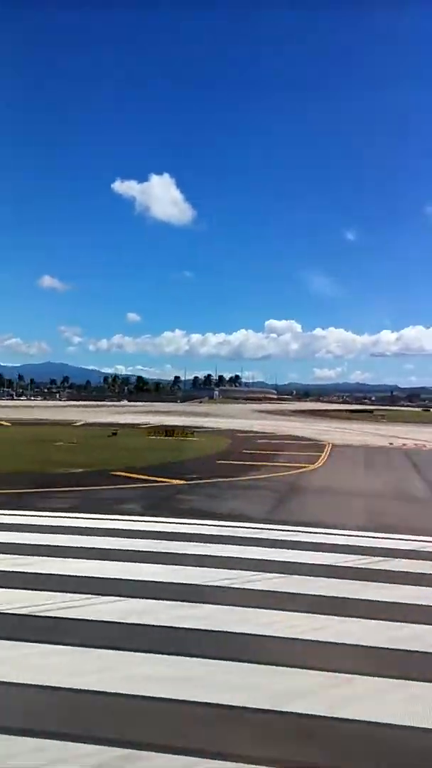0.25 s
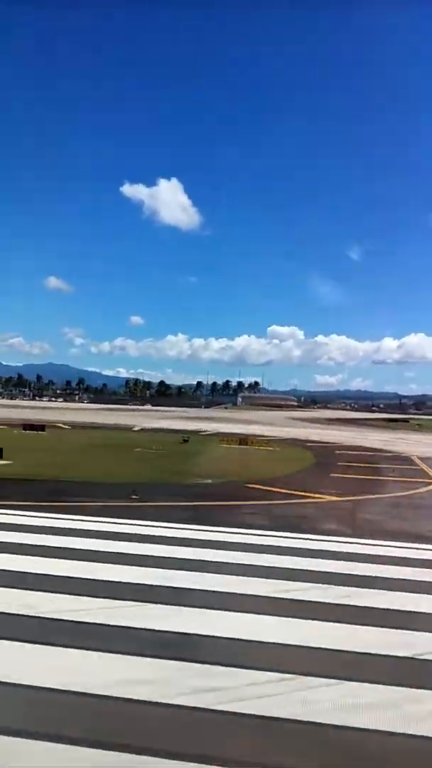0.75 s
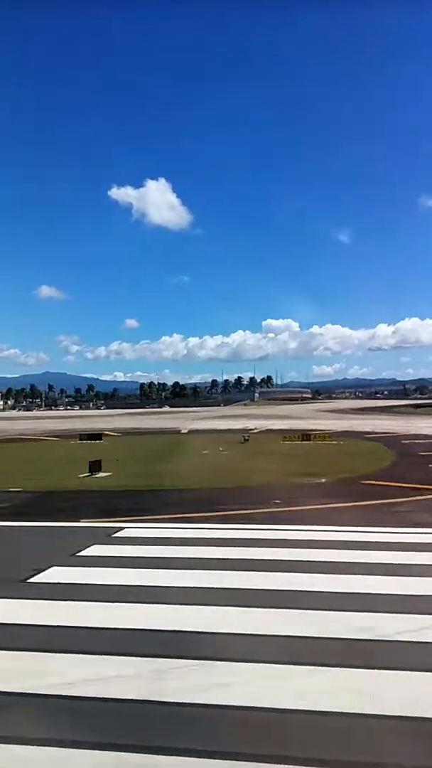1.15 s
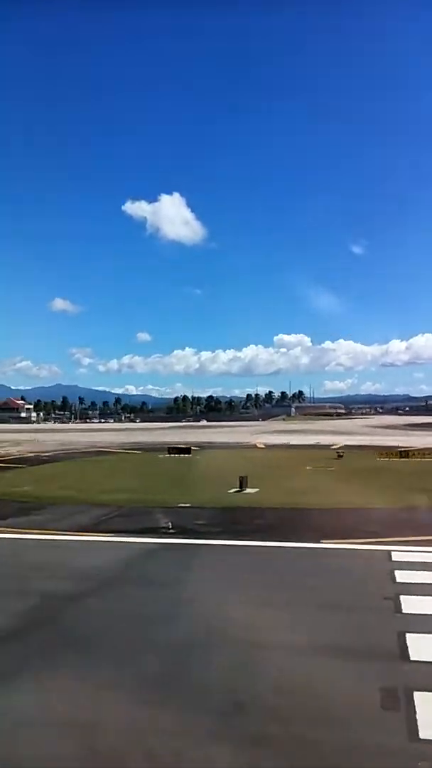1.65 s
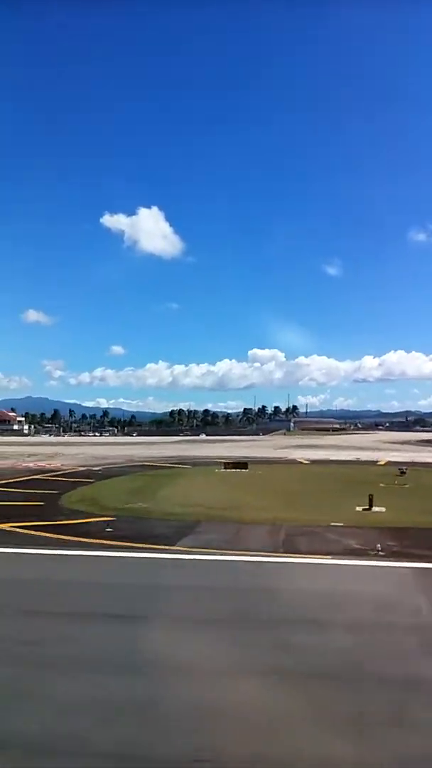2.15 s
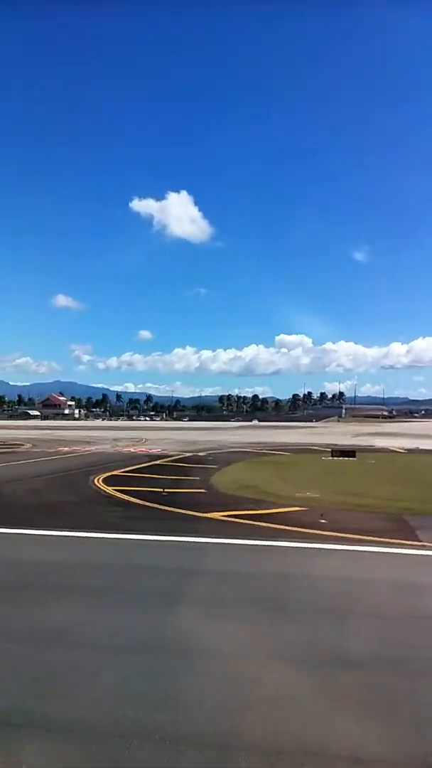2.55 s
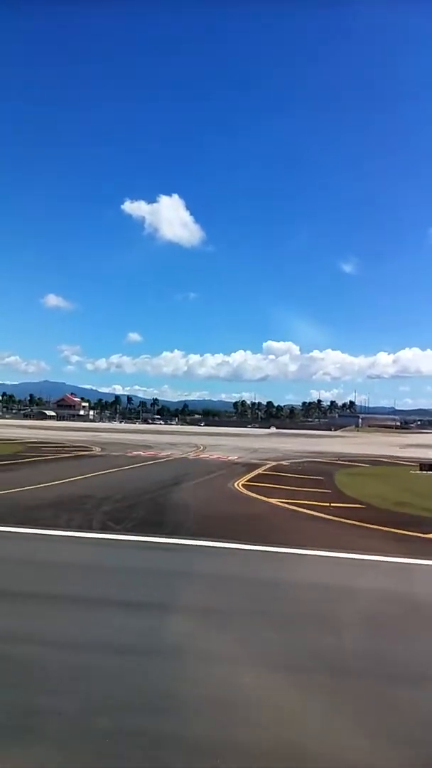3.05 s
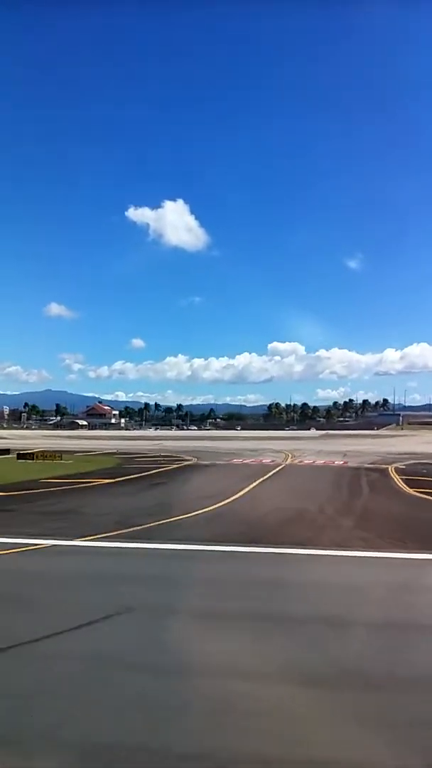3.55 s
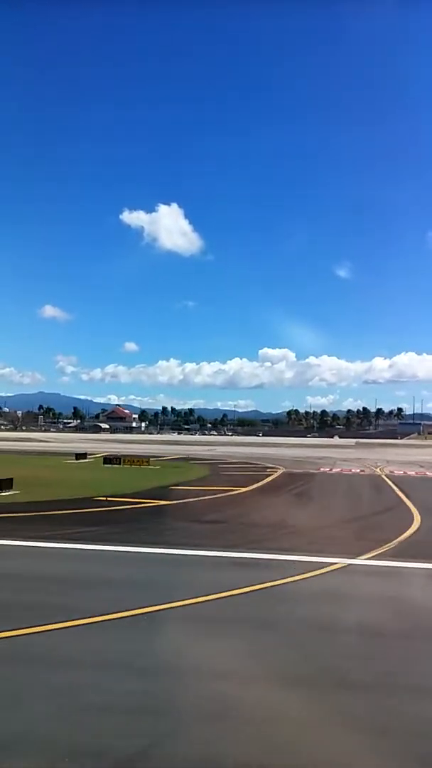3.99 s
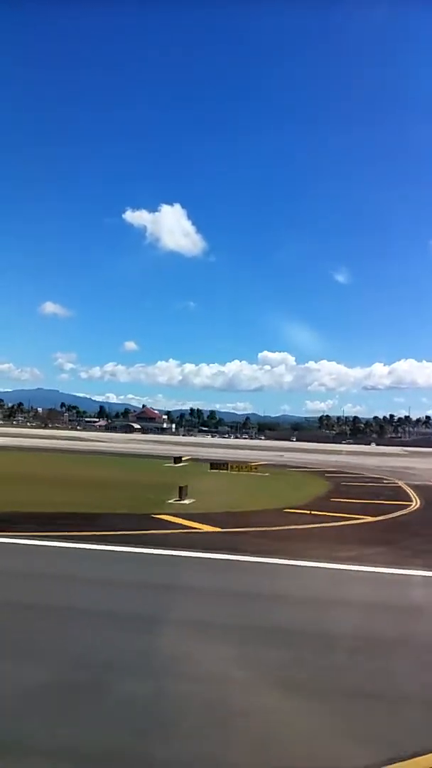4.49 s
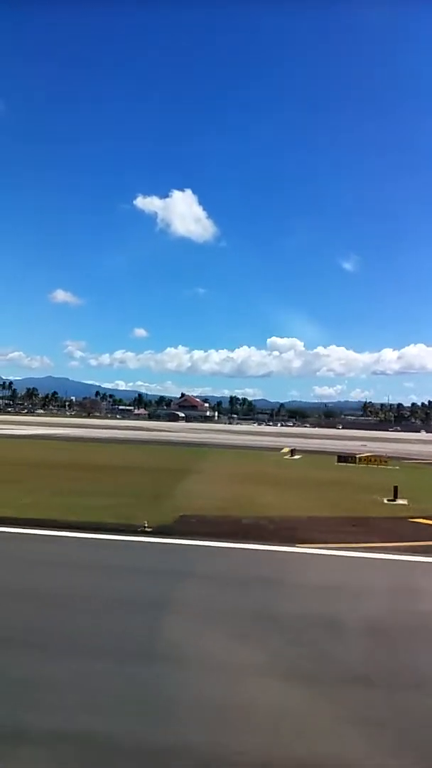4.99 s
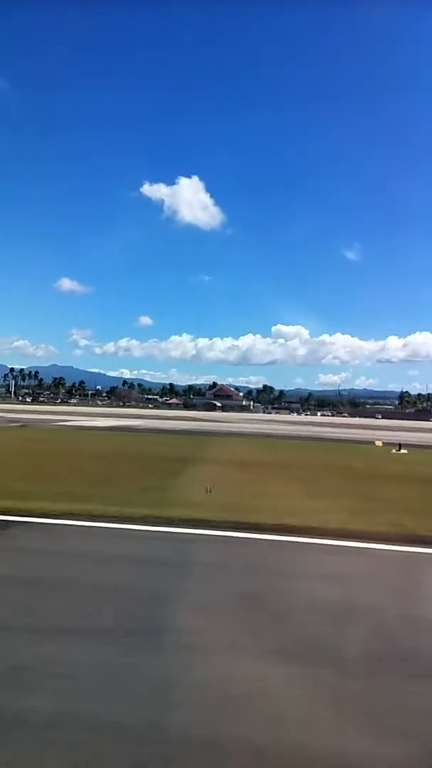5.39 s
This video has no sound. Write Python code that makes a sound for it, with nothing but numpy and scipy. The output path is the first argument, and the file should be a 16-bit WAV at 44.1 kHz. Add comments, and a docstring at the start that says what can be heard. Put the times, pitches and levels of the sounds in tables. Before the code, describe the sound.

A continuous muffled engine roar fills the passenger cabin, mid-low and heavy with a softer broad rush on top. It sputters like a flapping, failing microphone, cutting nearly to silence for milliseconds at a time with small ticks and pings. Long cuts thin out after about four seconds, while the faint, fluttering fan whine becomes clearer. No voices.

```python
"""An airliner starts its takeoff roll, heard from a window seat: jet roar through the cabin wall and the whine of the fan.
Subsonic pressure swings keep pushing the microphone's diaphragm against its stop, so the roar cuts out
in sputtering gaps: long ones mostly in the first seconds, brief random ones throughout."""
import sys
import numpy as np
from scipy import signal
from scipy.io import wavfile

SR = 44100
rng = np.random.default_rng(int(sys.argv[2]) if len(sys.argv) > 2 else 0)


def unload_audio(sound):
    """Save the sound as a 16-bit wav file, at the path given as the first command line argument."""
    columns = np.transpose(np.atleast_2d(sound))
    # keep every value between -1 and 1, then stretch to whole-number steps
    steps = np.round(np.clip(columns, -1, 1) * 32767)
    wavfile.write(sys.argv[1], SR, steps.astype(np.int16))


N = 248283

# the long dropouts, where a big swing holds the diaphragm against its stop: (from s, until s, times it slips free)
STALLS = [(0, 0.036, 0), (0.069, 0.108, 0), (0.132, 0.18, 0), (0.276, 0.298, 0), (0.41, 0.43, 0),
          (0.487, 0.51, 0), (0.525, 0.579, 0), (0.589, 0.63, 0), (0.639, 0.691, 0), (0.704, 0.753, 2),
          (0.771, 0.799, 0), (0.91, 0.933, 0), (1.01, 1.036, 0), (1.063, 1.077, 0), (1.155, 1.18, 1),
          (1.192, 1.226, 0), (1.252, 1.288, 0), (1.295, 1.324, 1), (1.576, 1.6, 2), (1.611, 1.635, 0),
          (1.674, 1.706, 0), (1.712, 1.744, 0), (1.882, 1.929, 3), (1.938, 1.962, 0), (2.035, 2.05, 0),
          (2.145, 2.172, 0), (2.199, 2.223, 0), (2.262, 2.29, 0), (2.491, 2.508, 0), (2.529, 2.555, 1),
          (2.589, 2.618, 0), (2.701, 2.738, 1), (2.767, 2.81, 2), (2.856, 2.884, 1), (2.907, 2.939, 0),
          (2.953, 2.997, 0), (3.055, 3.096, 0), (3.183, 3.215, 1), (3.235, 3.254, 0), (3.294, 3.307, 0),
          (3.314, 3.352, 0), (3.374, 3.39, 0), (3.397, 3.418, 0), (3.429, 3.446, 0), (3.586, 3.61, 0),
          (3.653, 3.686, 1), (3.754, 3.776, 0), (3.94, 3.953, 0), (4.623, 4.64, 0), (4.656, 4.674, 0),
          (5.089, 5.102, 0), (5.25, 5.264, 0), (5.386, 5.404, 0)]   # fixed
# the fan creeps up to full speed: (s, blade-passing Hz)
FAN_SPEED = [(0, 1926), (3.4, 1931), (5.0, 1956), (5.63, 1947)]   # fixed
# unequal blades sound other multiples of the shaft speed: (multiple, dB re blade-passing tone)
SHAFT_ORDERS = [(20, -20), (21, -15.5), (22, 3), (23, -14.5), (24, -18.5)]
BLADES = 22   # fixed
TURBINE_RATIO = 4.045   # fixed
# colours of the noises: (Hz, dB per Hz)
RUMBLE_COLOUR = [(50, -12), (90, -2), (120, -8.5), (170, 2.5), (240, 2), (320, -3), (450, -9.5), (700, -19), (1500, -47.5)]
JET_COLOUR = [(150, -18.5), (350, -2.5), (520, 0.5), (750, -4), (1050, -10), (1500, -14.5), (1950, -13.5), (2300, -18.5), (2800, -17.5), (3400, -25), (4300, -24), (5000, -27.5), (5900, -27), (7600, -36), (8700, -51.5), (11000, -53.5), (16000, -58)]
# brief rustles and squeaks in the cabin: (s, length s, lowest Hz, highest Hz, dB)
RUSTLES = [(.634, .005, 8500, 11000, -52), (1.184, .003, 9800, 13000, -41), (4.328, .02, 3000, 6800, -28.5)]   # fixed
CUTOFF_HZ = 15800   # fixed
# the deep rumble of the wheels grows with ground speed: (s, dB)
WHEELS = [(0, -26), (2.1, -10), (5.6, -9)]
WHEEL_COLOUR = [(35, -9.5), (52, -2.5), (75, -9), (120, -22.5)]
# smaller swings stall it briefly, less often as the aircraft gathers speed: (s, mean free run between stalls s)
FREE_RUN = [(0, .023), (3.5, .019), (4.0, .028), (5.6, .035)]
BRIEF_STALL_S, STALL_SPREAD, RUN_SPREAD = .0062, .33, .7   # typical length; log spreads of stalls and of free runs
REBOUND_S = .01   # fixed
# boom of the airframe: (s, dB)
BOOM = [(0, -14.5), (.8, -11.5), (1.25, -16), (1.9, -13), (2.7, -15), (4.1, -14.5), (5.6, -13.5)]
SURGE_DB, SURGE_HZ = 1.0, 3.0   # the boom swells and sinks at random
JET_DB = -22   # the exhaust is steady at takeoff thrust
# strength of the blade-passing tone, which grows as the fan speeds up: (s, dB)
WHINE = [(0, -48), (1.7, -40.5), (2.7, -43.5), (3.9, -38), (4.7, -37), (5.6, -37)]
WHINE_DB = None
WHINE_RISE_DB = None
CEILING = .92   # fixed
SUB_CUT_HZ = 42   # fixed
SLIP_S, SLIP_JITTER_S, SLIP_DB = 0.0033, .002, -3.5   # slips come about evenly spaced; each lets a weak sliver of roar through
GIVE_DB, GIVE_HZ = 1.53, 70.5   # the swings also stiffen and slacken the free diaphragm, so its sensitivity flickers


def from_db(db):
    """Decibels to gain."""
    return 10 ** (np.asarray(db) / 20)


def rms_one(x):
    """Scale to rms 1."""
    return x / np.sqrt(np.mean(x ** 2) + 1e-20)


def in_time(rows):
    """Each column of a curve at every sample."""
    s, *columns = np.transpose(rows)
    return [np.interp(np.arange(N) / SR, s, c) for c in columns]


def butter(x, hz, kind, order=2):
    """Causal low-, high- or band-pass."""
    return signal.sosfilt(signal.butter(order, np.clip(hz, 10, .45 * SR), kind, fs=SR, output="sos"), x)


def drift(rate_hz):
    """Slow chance with spread 1."""
    r = np.exp(-2 * np.pi * rate_hz / SR)
    return rms_one(signal.lfilter([1], [1, -2 * r, r * r], rng.standard_normal(N + SR))[SR:])


def resonance(x, hz, width_hz):
    """Two-pole resonance with gain 1 on top."""
    r = np.exp(-np.pi * width_hz / SR)
    return signal.lfilter(np.array([1, 0, -1]) * (1 - r * r) / 2, [1, -2 * r * np.cos(2 * np.pi * hz / SR), r * r], x)


def coloured_noise(colour):
    """Quarter-octave bands of noise, each at the level of the colour; rms 1."""
    hz, db = np.transpose(colour)
    edges = 25 * 2 ** (np.arange(39) / 4)   # fixed
    white, out = rng.standard_normal((2, N + SR // 4)), 0
    for k, (low, high) in enumerate(zip(edges, edges[1:])):
        level_db = np.interp(np.log(low * high) / 2, np.log(hz), db)
        if hz[0] < high and low < hz[-1]:
            out = out + from_db(level_db) * butter(white[k % 2], [low, high], "band", order=3)
    return rms_one(out[-N:])


def roar(boom_db=3.0):
    """The wheels rumble, the airframe booms; the exhaust adds a broad rush, dulled by the cabin wall."""
    wheels = from_db(in_time(WHEELS)[0]) * coloured_noise(WHEEL_COLOUR)
    boom = from_db(in_time(BOOM)[0] + boom_db + SURGE_DB * drift(SURGE_HZ)) * coloured_noise(RUMBLE_COLOUR)
    return wheels + boom + from_db(JET_DB) * coloured_noise(JET_COLOUR)


def engine_whine(flutter_db=4.5, turbine_db=-66, waver=.0008):
    """Fan tones on multiples of the shaft speed and a faint turbine line; turbulence makes them flutter."""
    blade_hz, level_db = in_time(FAN_SPEED)[0], in_time(WHINE)[0]
    phase = 2 * np.pi * np.cumsum(blade_hz * (1 + waver * drift(13.2))) / SR
    fan = sum(from_db(db + flutter_db * drift(18)) * np.sin(round(k) * phase / BLADES + rng.uniform(0, 2 * np.pi))
              for k, db in SHAFT_ORDERS)
    turbine = from_db(turbine_db + flutter_db * drift(8)) * np.sin(TURBINE_RATIO * phase)
    return np.sqrt(2) * (from_db(level_db) * fan + turbine)


def rustles():
    """Short swells of high noise."""
    t, out = np.arange(N) / SR, 0
    for s, length, low_hz, high_hz, db in RUSTLES:
        hiss = rms_one(butter(rng.standard_normal(N), [low_hz, high_hz], "band", order=4))
        out = out + from_db(db) * hiss * np.exp(-2 * ((t - s) / length) ** 2)
    return out


def brief_stalls(count=400):
    """Free runs and brief stalls take turns, each of a random length; true while stalled."""
    stalled, s = np.zeros(N, bool), 0
    for run, stall in rng.standard_normal((count, 2)):
        start = s + np.interp(s, *np.transpose(FREE_RUN)) * np.exp(RUN_SPREAD * run - RUN_SPREAD ** 2 / 2)
        s = start + BRIEF_STALL_S * np.exp(STALL_SPREAD * stall)
        stalled[int(start * SR):int(s * SR)] = True
    return stalled


def scene():
    """Everything that sounds in the cabin."""
    return (roar() + engine_whine() + rustles())[None]


def freedom():
    """1 while the diaphragm moves freely, 0 on its stop: brief stalls, long ones with slips, momentary grazes."""
    t = np.arange(N) / SR
    free = 1. - brief_stalls()
    for start, end, slips in STALLS:
        free[(t >= start) & (t < end)] = 0
        # after a long stall it rebounds clear of the stop
        free[(t >= end) & (t < end + REBOUND_S)] = 1
        for s in np.linspace(start, end, slips + 2)[1:-1]:
            free[np.abs(t - s - SLIP_JITTER_S * rng.standard_normal()) < SLIP_S / 2] = from_db(SLIP_DB)
    grazing = drift(330) > 1.45   # fixed
    return free * ~grazing


def microphone(pressure, leak_db=-53, tick_db=-45, bass_cut_hz=136, ring_hz=4020, ring_width_hz=140, ring_depth=2.2):
    """A stalled diaphragm rests at one place; the filters behind it ring out into each gap."""
    free, sample = freedom(), np.arange(N)
    # the slow pressure swing carries each burst away from the stop and back to it
    swing = np.interp(sample, sample[free == 0], pressure[0, free == 0])
    place = free * from_db(GIVE_DB * drift(GIVE_HZ)) * (pressure - swing) + from_db(leak_db) * swing
    # meeting and leaving the stop gives a tiny tick
    ticks = from_db(tick_db) * np.diff(free, prepend=free[0]) * rng.standard_normal(N)
    voltage = butter(place + np.cumsum(ticks), bass_cut_hz, "high")
    # a linear-phase filter takes out what is left of the subsonic swing
    voltage = signal.sosfiltfilt(signal.butter(6, SUB_CUT_HZ, "high", fs=SR, output="sos"), voltage)
    # a narrow resonance in opposite phase leaves the colour alone but pings after each cut
    return voltage - ring_depth * resonance(voltage, ring_hz, ring_width_hz)


def record(dry, hiss_db=-78):
    """The overloaded microphone, a little self-noise, rounded peaks and a steep top cut."""
    voltage = microphone(dry) + from_db(hiss_db) * butter(rng.standard_normal(N), 6000, "low")
    rounded = CEILING * np.tanh(voltage / CEILING)
    return signal.sosfilt(signal.ellip(10, .1, 80, CUTOFF_HZ, fs=SR, output="sos"), rounded)


dry = scene()
out = record(dry)
unload_audio(out)
```